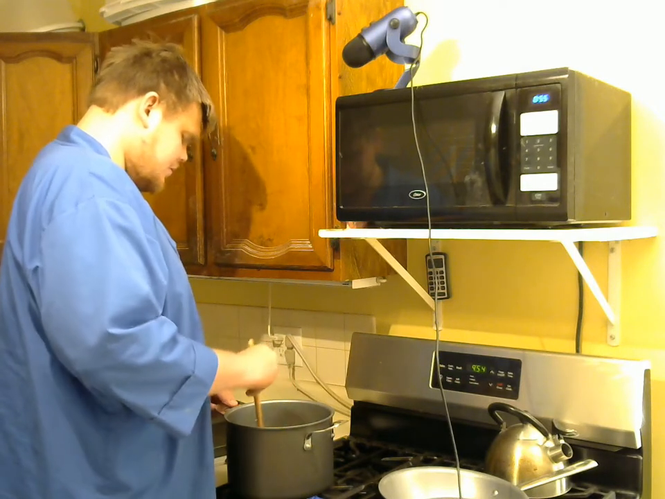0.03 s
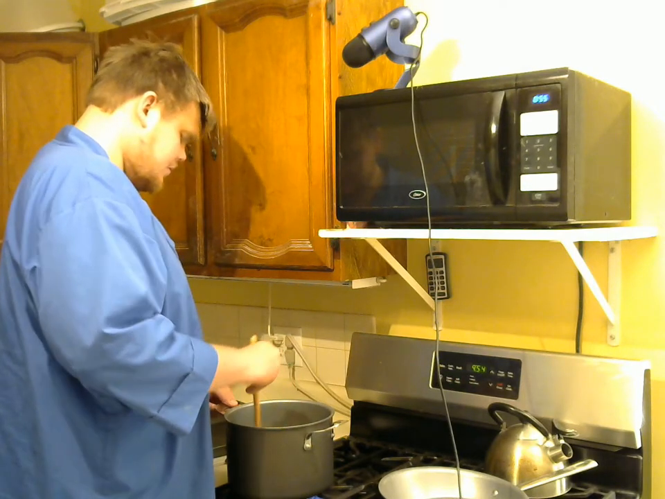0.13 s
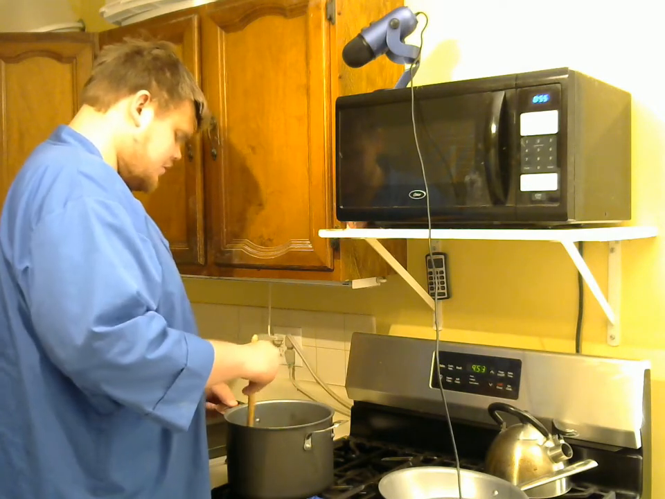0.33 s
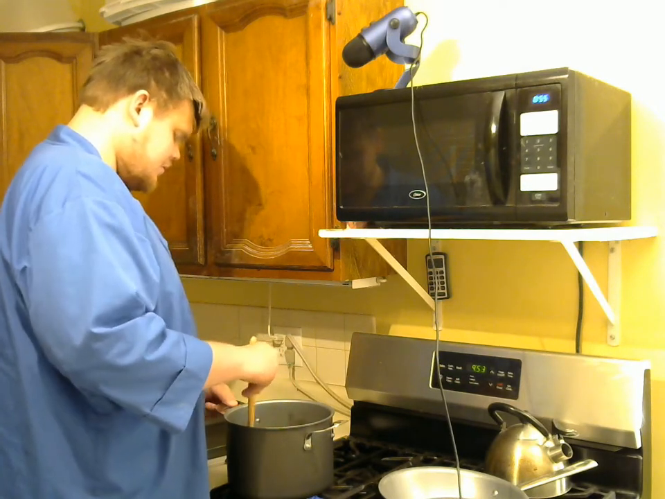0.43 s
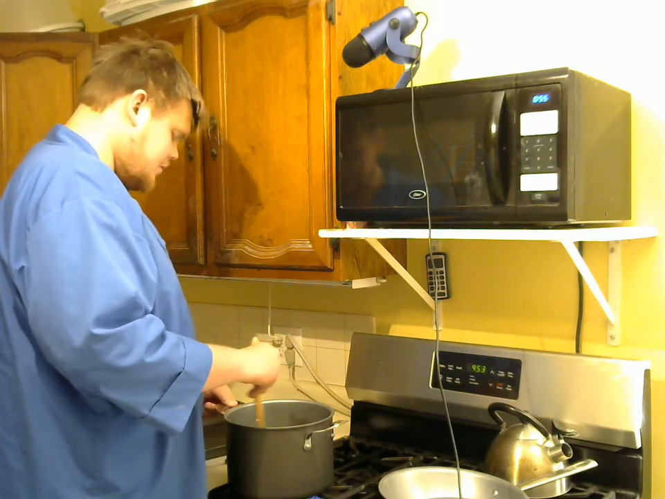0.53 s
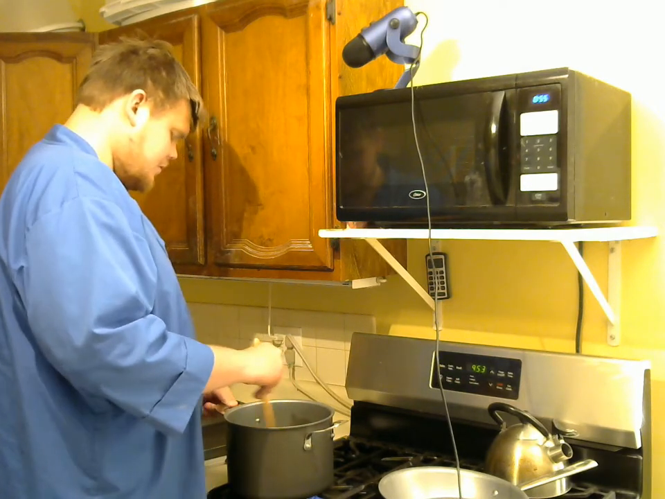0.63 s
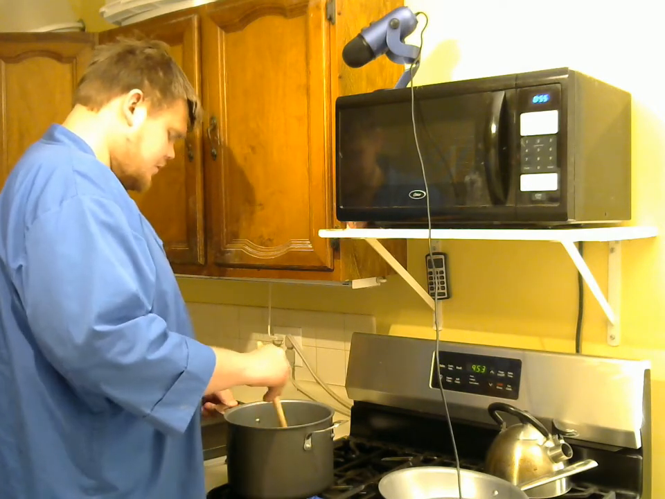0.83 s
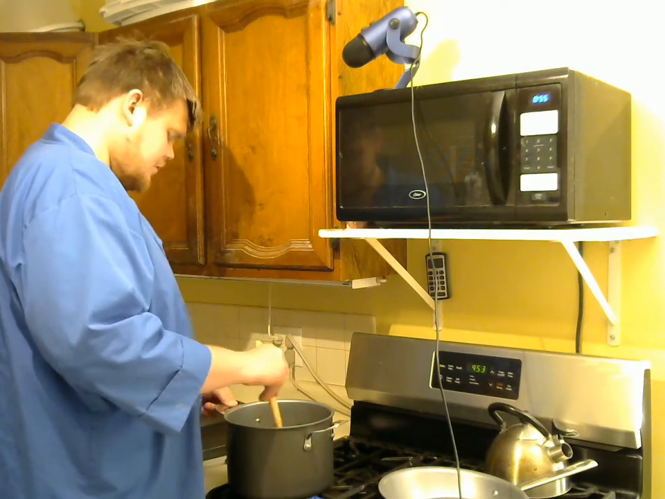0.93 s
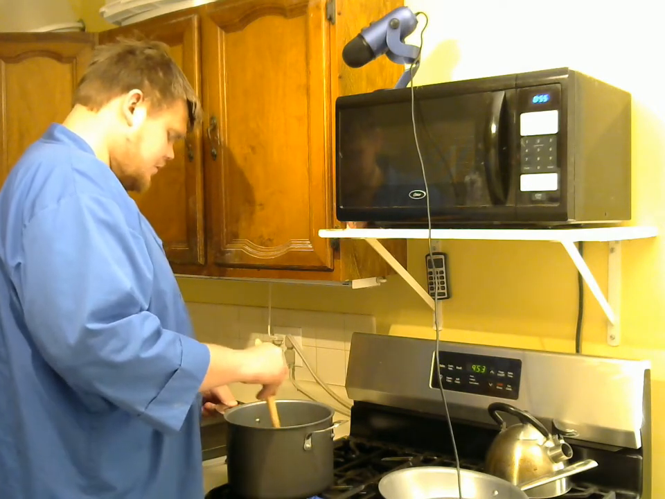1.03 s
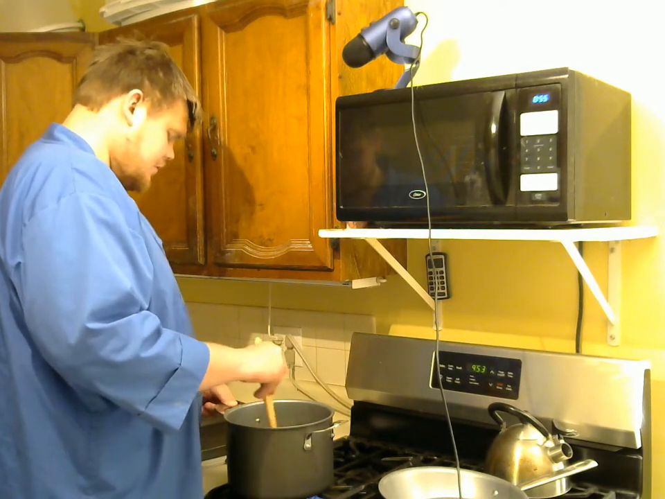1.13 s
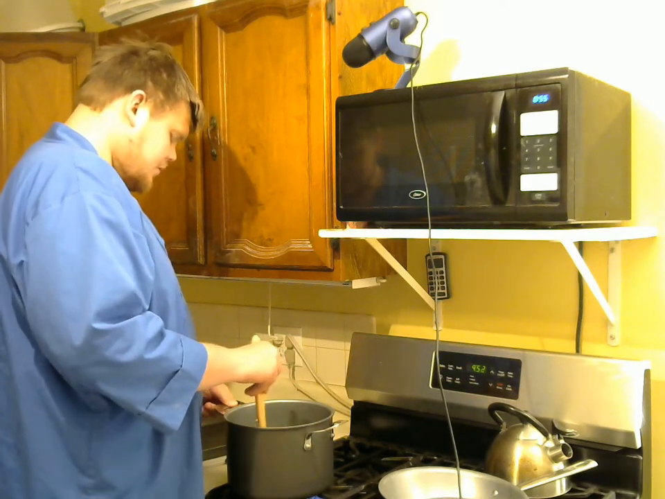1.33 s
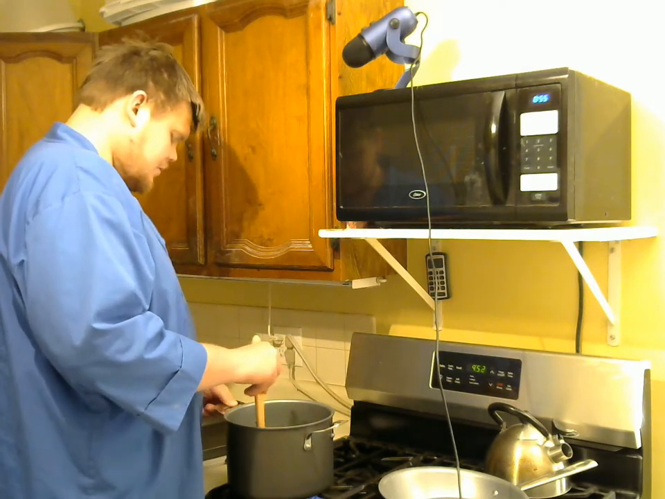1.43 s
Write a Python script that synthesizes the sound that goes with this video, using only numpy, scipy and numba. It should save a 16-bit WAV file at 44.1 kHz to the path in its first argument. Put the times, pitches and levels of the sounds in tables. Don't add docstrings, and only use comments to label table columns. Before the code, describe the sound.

Wooden spoon stirring in a metal pot: brief quiet hum, one hard ringing clank, gritty scraping with ticks and bumps, a softer knock near the end, in a small, slightly echoing kitchen.

```python
import sys
import numpy as np
from scipy import signal
from scipy.fft import rfft, irfft
from scipy.io import wavfile
from scipy.ndimage import uniform_filter1d
from numba import njit

SR = 44100
rng = np.random.default_rng(int(sys.argv[2]) if len(sys.argv) > 2 else 0)


def magnitude_from_level(level_db):
    exponent = np.asarray(level_db, float) / 20
    return 10 ** exponent


def wrap_up_sound(samples):
    columns = np.atleast_2d(samples).T
    tamed = np.clip(columns, -1, 1)
    steps = np.round(tamed * 32767).astype(np.int16)
    wavfile.write(sys.argv[1], SR, steps)


N = 66150


def unit(x):
    return x / np.sqrt(np.mean(x ** 2))


def white():
    return rng.standard_normal(N)


def colour(x, points):
    hz, db = np.array(points).T
    f = np.arange(N // 2 + 1) * SR / N + 1
    return irfft(rfft(x) * magnitude_from_level(np.interp(np.log(f), np.log(hz), db)), N)


def split_filter(x, order, hz, side):
    return signal.sosfilt(signal.butter(order, hz, side, fs=SR, output="sos"), x)


@njit
def svf(x, hz, width):
    y, b, l = np.empty(len(x)), 0., 0.
    for i in range(len(x)):
        g, k = np.tan(np.pi * hz[i] / SR), width / hz[i]
        v = (b + g * (x[i] - l)) / (1 + g * (g + k))
        b, l, y[i] = 2 * v - b, l + 2 * g * v, k * v
    return y


def band(x, hz, width):
    return unit(svf(x, hz + np.zeros(N), 1. * width))


def walk(rate):
    k = int(SR / rate)
    steps = np.repeat(rng.standard_normal(N // k + 1), k)
    return unit(uniform_filter1d(steps, k)[:N])


def since(s):
    return np.maximum(np.arange(N) / SR - s, 0)


def decay(t, t60):
    return np.exp(-np.log(1000) * t / t60)


def fade(s, t60, rise):
    t = since(s)
    return (1 - np.exp(-t / rise)) * decay(t, t60)


def knock_rattle(noise, s):
    # pitch_hz [Hz], level_db [dB]
    rattle_colour = [(290, -59), (500, -19.5), (1150, -12.5), (1430, -56), (1600, -18), (2100, -4.5),
                     (2260, -3.5), (5200, -10.5), (15500, -35)]
    hiss = unit(colour(noise, rattle_colour))
    low = split_filter(hiss, 2, 5000, "low")
    treble = hiss - low
    return magnitude_from_level(1.5) * (low * fade(s, 0.33, 0.0013) + treble * fade(s, 0.25, 0.0058))


def ring_modes(noise, s, pitches, rings, gain_db):
    t, total = since(s), 0
    for hz, (mode_db, t60, close) in zip(pitches, rings):
        rise = 0.007 if 2700 < hz < 6000 else .0008
        cluster_width = 35.3 + 0.018 * hz
        tone = np.sin(2 * np.pi * hz * t) + close * band(noise, hz, cluster_width)
        total = total + magnitude_from_level(mode_db + gain_db) * tone * fade(s, t60, rise)
    return total


def knocks():
    # start_s [s], level_db [dB], ring_db [dB], contact_ms [ms], spoon_pitch [ratio]
    blows = [
        (0.2058, -16.5, -4, 0.055, 0.99),
        (0.9928, -31, -8, 0.16, 0.97),
        (1.16, -44, -4.5, 0.096, 1.2),
    ]
    # pitch_hz [Hz]; then level_db [dB], t60_s [s], neighbours [share]
    pot_hz = [328, 1174.5, 1611, 1810, 2228, 2334, 2866, 3096, 3562, 3885, 4138, 5042, 5750, 6772]
    pot_ring = [(-8, 0.45, 0.27), (-1.5, 0.4, 0.21), (-1.5, 0.31, 0.3), (-1, 0.35, 0.19), (7, 0.26, 0.19),
                (-10, 0.3, 0.21), (-5, 0.43, 0.44), (-4, 0.29, .9), (-2.5, 0.27, .7), (5.5, 0.22, 0.17),
                (-10, 0.4, 0.23), (-6, 0.26, 2.7), (-7.5, 0.35, 1.25), (-8.5, 0.25, 1.8)]
    dense_hz = [960, 1010, 1548, 1895, 1930, 2130, 2643, 2886, 3050, 3180, 3370, 3487, 3620, 700]
    dense_ring = [(-15, 0.11, 0.37), (-6, 0.16, 0.38), (-23, 0.25, 0.42), (-11, 0.21, .2),
                  (0.5, 0.18, 0.17), (-14, 0.16, 0.38), (-27, 0.17, .3), (7.5, 0.17, 0.22),
                  (2.5, 0.24, 0.45), (2.5, 0.23, 0.13), (-15.5, 0.12, 0.21), (0.5, 0.33, 0.27),
                  (-3, 0.32, .2), (-30, 0.3, 0.23)]
    spot_hz = [395, 1085, 1635, 2001, 2524, 580, 4650, 5300, 7000, 8050, 9300, 10700, 12300, 13700]
    spot_ring = [(-12.5, 0.29, 0.33), (-5.5, 0.07, 0.76), (15, 0.057, 0.13), (-4, .07, 0.13),
                 (3, 0.11, 0.1), (-17, 0.12, 1.04), (-19, 0.27, 1.7), (-5.5, 0.21, 1.15),
                 (-6.5, 0.05, 1.46), (-11.5, 0.15, 1.4), (-17, 0.2, 1.1), (-20, 0.14, 0.77),
                 (-36, .15, 1.3), (-34, .12, 1.1)]
    out = 0
    for s, db, ring_db, contact_ms, ratio in blows:
        noise = white()
        hit = knock_rattle(noise, s)
        hit = hit + ring_modes(noise, s, pot_hz, pot_ring, ring_db)
        hit = hit + ring_modes(noise, s, dense_hz, dense_ring, ring_db)
        hit = hit + ring_modes(noise, s, ratio * np.array(spot_hz), spot_ring, 0)
        keep = np.exp(-1000 / SR / contact_ms)
        out = out + magnitude_from_level(db) * signal.lfilter([1 - keep], [1, -keep], hit)
    return out


def grains():
    chance, size = rng.random((N, 2)).T
    clicks = (chance < 6000 / SR) * magnitude_from_level(-np.log(size + 1e-9))
    return (unit(clicks) + 1.45) * white()


def rubbing(on_wall):
    # pitch_hz [Hz], level_db [dB]
    rub_colour = [(350, -20), (600, -0.5), (716, -12), (1320, -4), (2040, -8), (2720, -11.5), (4620, -16),
                  (7540, -18.5), (15500, -42.5)]
    # pitch_hz [Hz], width_hz [Hz], level_db [dB]
    base = [(1085, 76, -1.5), (1630, 41, -5.5), (1899, 18, -4), (735, 21, -3.5), (6730, 900, -12),
            (8900, 300, -20), (5150, 66, -16), (3850, 29, -27)]
    wall = [(2540, 480, -11), (2810, 77, -19), (1846, 31, -21.5), (4170, 37, -20.5), (5540, 710, -16),
            (6380, 2100, -17.5), (7700, 280, -18), (10900, 820, -26), (12500, 350, -27)]
    grit = grains()
    broad = unit(colour(grit, rub_colour))
    bright = split_filter(broad, 2, 3600, "high")
    rub = broad - (1 - magnitude_from_level(-26 * on_wall)) * bright
    base_ring = sum(magnitude_from_level(db + 1.3 * walk(26.2)) * band(grit, hz, w) for hz, w, db in base)
    wall_ring = sum(magnitude_from_level(db) * band(band(grit, hz, w), hz, 2 * w) for hz, w, db in wall)
    return rub + 0.4 * base_ring + on_wall * magnitude_from_level(4) * wall_ring


def scrape():
    # start_s [s], rub_db [dB], judder_db [dB], judder_hz [Hz], sing_db [dB]
    strokes = [(0.411, -37.5, -32, 470, -65), (0.434, -53.5, -36, 492.4, -86),
               (0.488, -49, -28.5, 424, -78), (0.504, -45, -24.5, 456, -80),
               (0.586, -39.5, -33.5, 410, -48), (0.691, -37, -21.5, 520, -40),
               (0.722, -41.5, -28.5, 426, -45), (0.832, -44, -32, 433, -46), (0.932, -42.5, -35, 473, -44),
               (0.985, -44.5, -67, 436, -42), (0.994, -43.5, -33, 396, -42), (1.08, -43.5, -45, 447, -52),
               (1.138, -45, -85, 450, -57), (1.166, -42, -50, 500, -45), (1.234, -51, -32.5, 395, -50.5),
               (1.316, -45.5, -29, 400, -47), (1.43, -54, -36.5, 437, -111), (1.5, -71, -66, 434, -87)]
    s, rub_db, judder_db, judder_hz, sing_db = np.array(strokes).T
    t = np.arange(N) / SR
    on = np.clip((t - s[0]) / 0.0058, 0, 1)
    on_wall = np.clip(np.minimum(t - 0.745, 1.314 - t) / 0.01, 0, 1)

    def at(values):
        return np.interp(t, s, values)

    rub = rubbing(on_wall)
    sing_hz = 1308 * (1 + .007 * walk(6))
    sing = magnitude_from_level(1.5 * walk(37.4)) * band(band(grains(), sing_hz, 28), sing_hz, 220)
    judder = magnitude_from_level(2.0 * walk(33.6)) * band(band(grains(), at(judder_hz), 70), at(judder_hz), 210)
    rub = magnitude_from_level(at(rub_db) - 1.84 + 1.24 * walk(29.78)) * rub
    return on * (rub + magnitude_from_level(at(sing_db) - 11) * sing + magnitude_from_level(at(judder_db) - 12.5) * judder)


def drag_rings(rows, sag_db):
    out = 0
    for s, db, hz, hold in rows:
        t = since(s)
        tone = magnitude_from_level(db - sag_db * t) * np.sin(2 * np.pi * hz * t)
        out = out + tone * (1 - np.exp(-t / 0.0024)) * decay(since(s + hold), 0.03)
    return out


def bumps():
    # start_s [s], level_db [dB], pitch_hz [Hz], hold_s [s]
    thumps = [(.416, -29.5, 500, 0.003), (.461, -31.5, 496, 0.007), (.468, -34, 342, 0.013),
              (.494, -26, 437, 0.0093), (.512, -29, 457, 0.0035), (.535, -29, 418, 0.014),
              (.551, -30.5, 513, .012), (.562, -34, 362, 0.01), (.574, -24, 413, 0.0037),
              (.593, -29.5, 327, 0.0096), (.618, -22.5, 385, 0.009), (.626, -27, 556, 0.011),
              (.638, -29, 337, 0.017), (.657, -27, 559, 0.011), (.668, -31, 356, 0.013),
              (.687, -28, 528, 0.03), (.7135, -13, 502, 0.012), (.727, -19, 485, .006),
              (.7375, -22.5, 452, 0.0091), (.755, -46, 452, .01), (.777, -25, 515, 0.024),
              (.905, -26.5, 492, 0.011), (1.153, -44, 466, 0.0065), (1.170, -30, 473, 0.012),
              (1.252, -34, 419, 0.021), (1.318, -29, 407, 0.014), (1.33, -31.5, 402, 0.01),
              (1.381, -33.5, 392, 0.017), (1.397, -32.5, 397, 0.0069), (1.416, -37.5, 391, 0.01),
              (1.455, -37, 458, 0.0055)]
    return drag_rings(thumps, sag_db=197)


def squeaks():
    # start_s [s], level_db [dB], pitch_hz [Hz], hold_s [s]
    slides = [(.695, -37.5, 1063, 0.027), (.782, -45, 1300, 0.0063), (.797, -36, 1317, 0.0067),
              (.82, -40, 1257, 0.0071), (.843, -29, 1280, 0.0046), (.872, -50, 1280, 0.0073),
              (.896, -40, 1244, 0.01), (.913, -36, 1280, 0.013), (.934, -40, 1266, 0.0047),
              (.956, -37, 1311, 0.035), (1.0, -38, 1260, 0.011), (1.034, -28.5, 1317, 0.008),
              (1.074, -36.5, 1308, .014), (1.11, -39.5, 1338, 0.026), (1.144, -43, 1310, 0.016),
              (1.162, -36, 1308, .014), (1.186, -43, 1315, 0.013), (1.226, -43, 1313, 0.0075),
              (1.254, -38.5, 1265, 0.0057), (1.293, -40, 1317, 0.0085)]
    return drag_rings(slides, sag_db=33)


def ticks():
    # start_s [s], level_db [dB], tail_s [s], top_db [dB]
    catches = [(0.4165, -28, 0.31, -9.5), (.495, -31.5, 0.27, -15), (0.533, -36.5, 0.36, -4),
               (0.5772, -43, 0.041, -18), (.85, -37, 0.5, -13), (1.16, -39.5, 0.4, -3),
               (1.3, -42, 0.069, 0), (1.382, -41.5, 0.13, -6), (1.433, -40.5, 0.36, -9)]
    # pitch_hz [Hz], level_db [dB]
    tick_colour = [(1180, -46), (2000, -21), (2920, 10), (3340, 6.5), (3800, 10.5), (4880, -1), (7550, 7.5),
                   (15500, -17.5)]
    hiss = unit(colour(white(), tick_colour))
    top = unit(split_filter(white(), 4, 11500, "high"))
    out = 0
    for s, db, tail, top_db in catches:
        shape = .6 * fade(s, 0.0064, .0003) + 0.53 * fade(s, tail, 0.0015)
        out = out + magnitude_from_level(db - 6) * (hiss + magnitude_from_level(top_db) * top) * shape
    return out


def snaps():
    # start_s [s], level_db [dB], pitch_hz [Hz], t60_s [s]
    grit_snaps = [(.4158, -34.5, 7300, .015), (.4955, -35, 7400, .012), (.4985, -41, 7600, .01),
                  (.509, -39, 5480, 0.058), (.522, -34, 7570, 0.013), (0.5338, -29, 7700, .01),
                  (.54, -38, 6960, .015), (0.5777, -31, 6800, 0.018), (0.588, -41, 6900, .015),
                  (.9928, -29, 1950, 0.05), (1.299, -50, 7700, .015)]
    t, grit = np.arange(N) / SR, white()
    out = 0
    for s, db, hz, t60 in grit_snaps:
        tone = np.sin(2 * np.pi * hz * t) + 0.45 * band(grit, hz, 2300)
        out = out + magnitude_from_level(db) * tone * fade(s, t60, 0.0002)
    return out


def echo(pot):
    tail = signal.lfilter([.6], [1, -.4], white()) * fade(.004, .33, 0.0071)
    wet = signal.fftconvolve(pot, tail / np.sqrt(np.sum(tail ** 2)))[:N]
    return magnitude_from_level(-11) * wet


def pot_hollow():
    # start_s [s], level_db [dB]
    hollow_level = [(0, -40), (.2, -47.5), (.95, -46), (1.08, -50.5), (1.5, -50.5)]
    t = np.arange(N) / SR
    tone = magnitude_from_level(5.4 * walk(16)) * np.sin(2 * np.pi * 326 * t)
    breath = 0.97 * band(white(), 326, 12.7)
    return magnitude_from_level(np.interp(t, *np.array(hollow_level).T)) * (tone + breath)


def appliance():
    # pitch_hz [Hz], width_hz [Hz], level_db [dB]
    drone = [(140.8, 7.2, -53), (494.7, 26, -58), (250.5, 27, -51), (1300, 150, -60.5), (59, 30, -68),
             (802, 140, -58), (2980, 270, -66.5), (5670, 180, -70), (7150, 1100, -66.5),
             (10670, 120, -74.5), (29.6, 22, -63)]
    return sum(magnitude_from_level(db + 0.75 * walk(9.65)) * band(white(), hz, w) for hz, w, db in drone)


def room_air():
    # pitch_hz [Hz], level_db [dB]
    air_colour = [(20, -6), (45, -18), (90, -11), (200, -6.5), (400, -6), (700, -21), (2000, -31.5),
                  (15500, -48.5)]
    air = magnitude_from_level(-40.5 - 4) * unit(colour(white(), air_colour))
    hum = magnitude_from_level(-50 + 2 * walk(14)) * np.sin(2 * np.pi * 59.7 * np.arange(N) / SR)
    return air + hum


def scene():
    pot = knocks() + scrape() + bumps() + squeaks() + ticks() + snaps()
    kitchen = pot_hollow() + appliance() + room_air()
    return (pot + echo(pot) + kitchen)[None]


def roll_off(x):
    return signal.sosfilt(signal.butter(12, 15820, fs=SR, output="sos"), x)


def record(dry):
    rounded = np.tanh(0.59 * dry) / 0.61 * 0.96
    top_cut = signal.ellip(8, .2, 70, 15900, fs=SR, output="sos")
    mix = signal.sosfilt(top_cut, rounded)
    return roll_off(mix)


dry = scene()
out = record(dry)
wrap_up_sound(out)
```